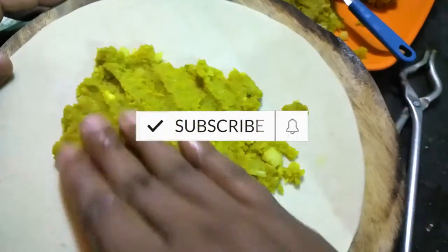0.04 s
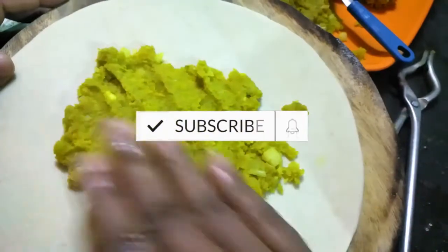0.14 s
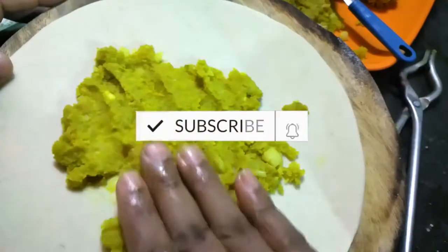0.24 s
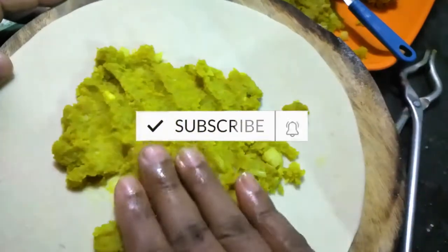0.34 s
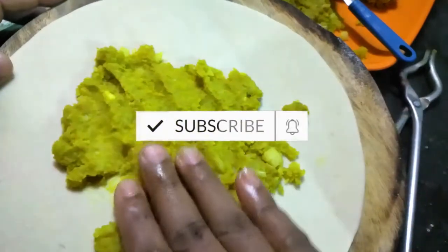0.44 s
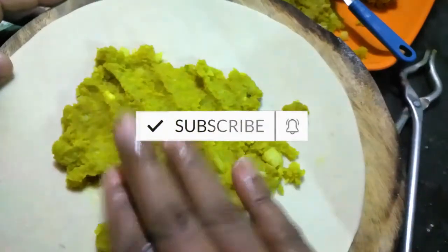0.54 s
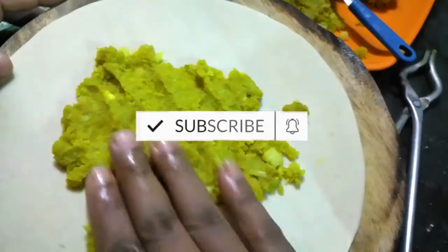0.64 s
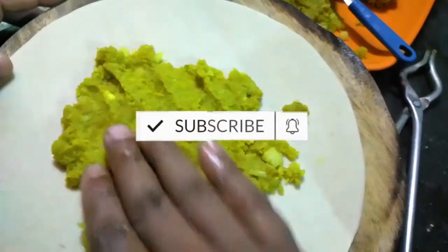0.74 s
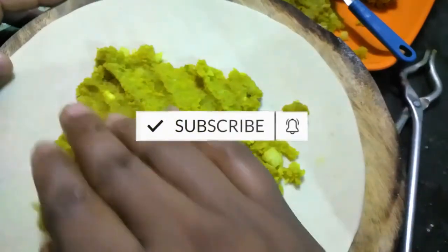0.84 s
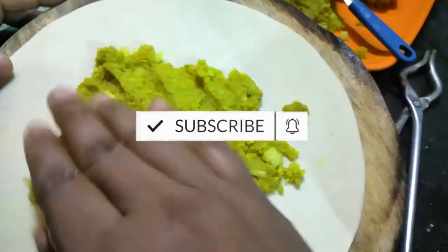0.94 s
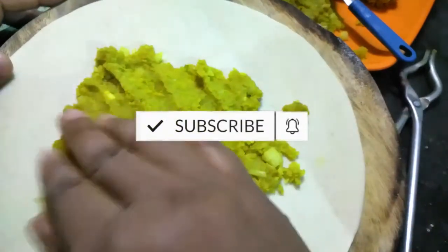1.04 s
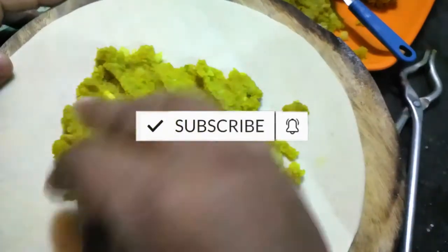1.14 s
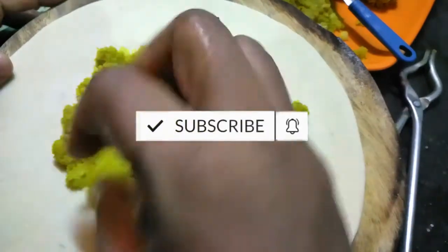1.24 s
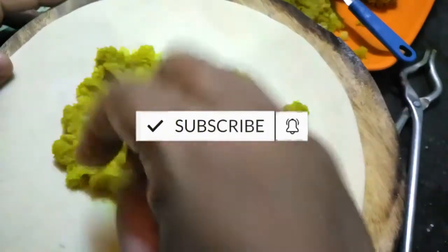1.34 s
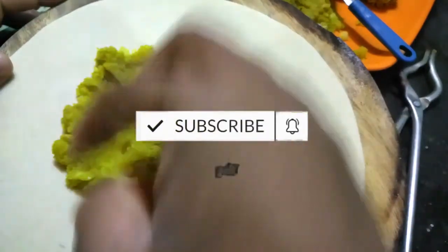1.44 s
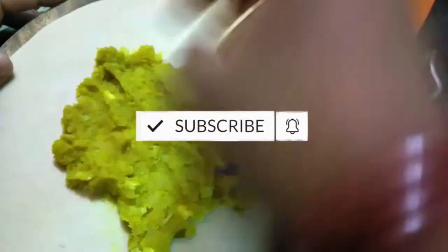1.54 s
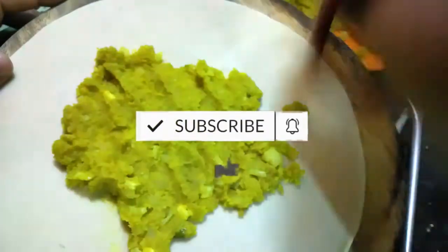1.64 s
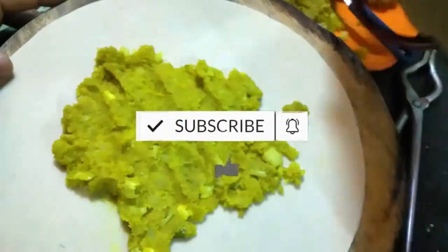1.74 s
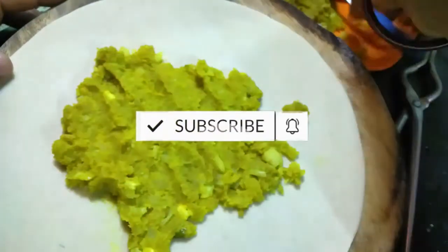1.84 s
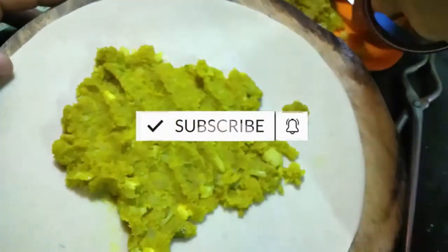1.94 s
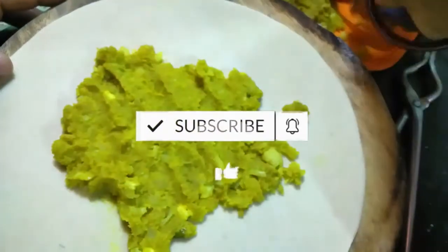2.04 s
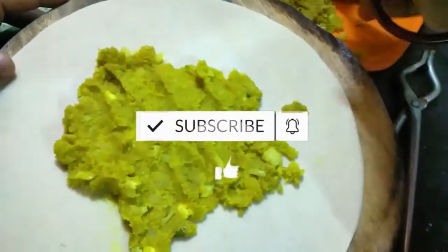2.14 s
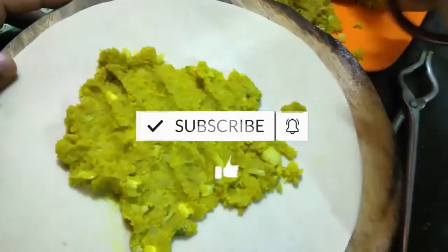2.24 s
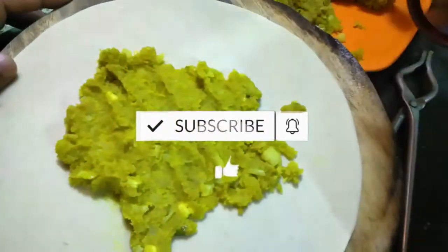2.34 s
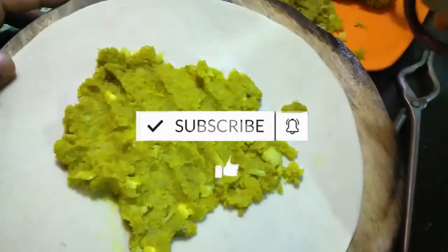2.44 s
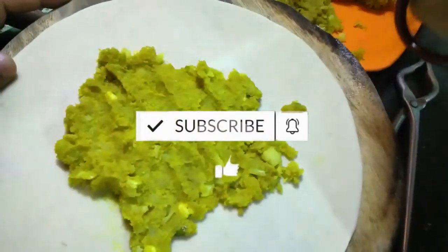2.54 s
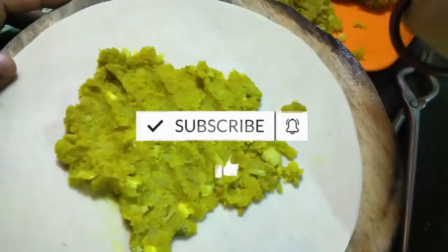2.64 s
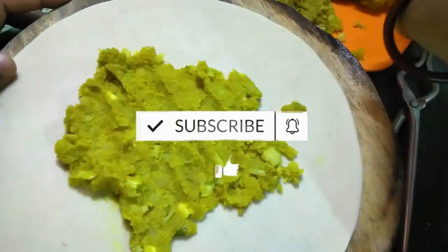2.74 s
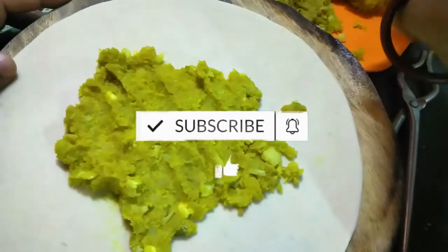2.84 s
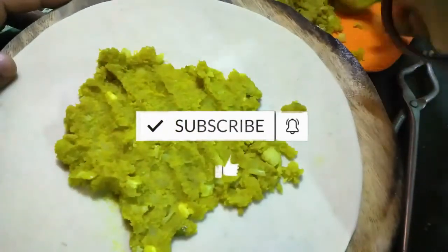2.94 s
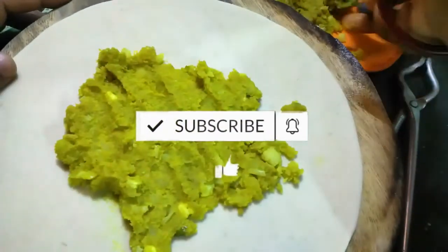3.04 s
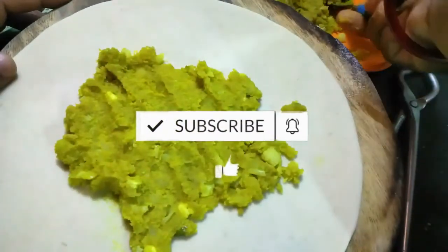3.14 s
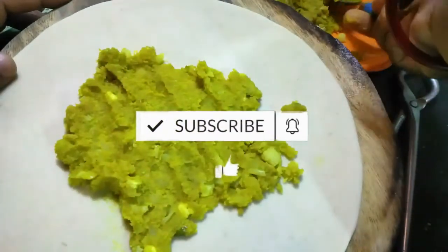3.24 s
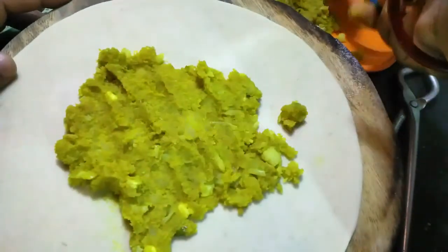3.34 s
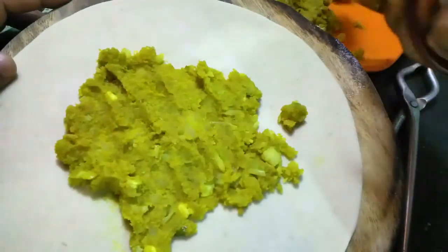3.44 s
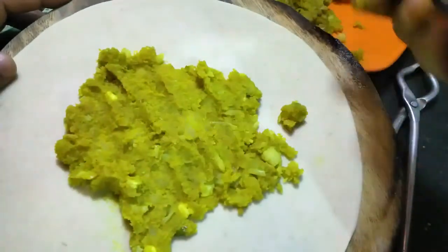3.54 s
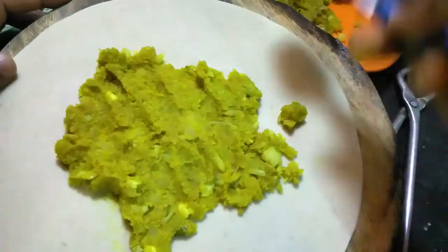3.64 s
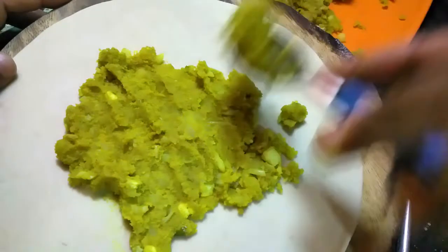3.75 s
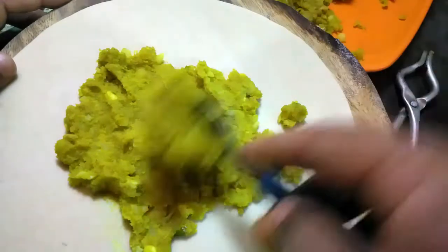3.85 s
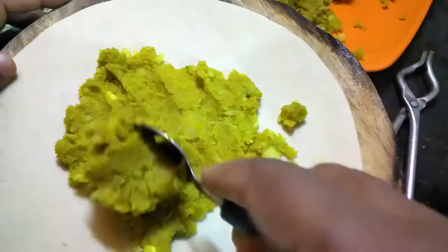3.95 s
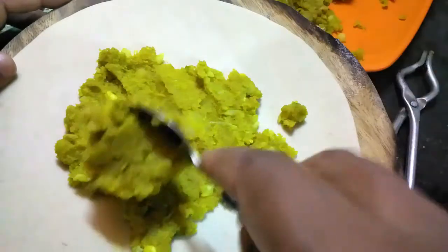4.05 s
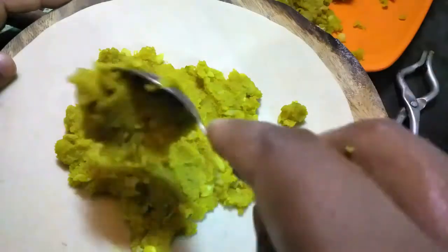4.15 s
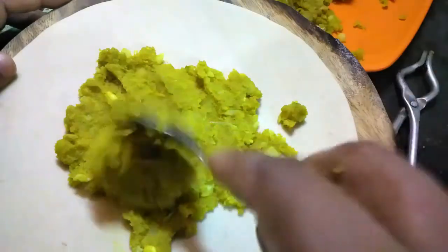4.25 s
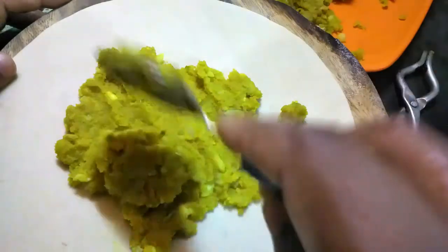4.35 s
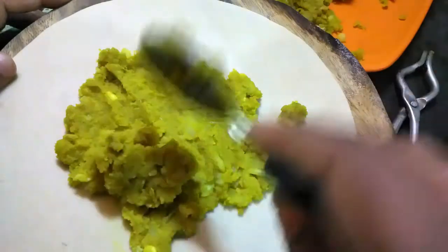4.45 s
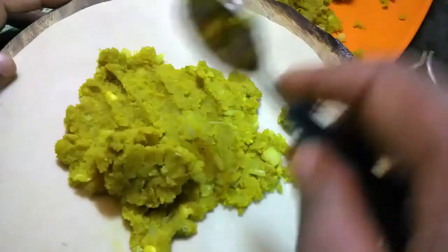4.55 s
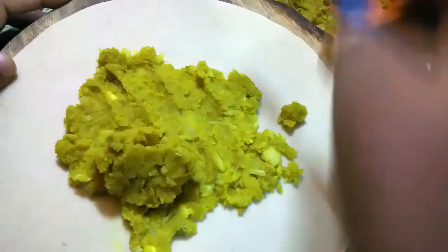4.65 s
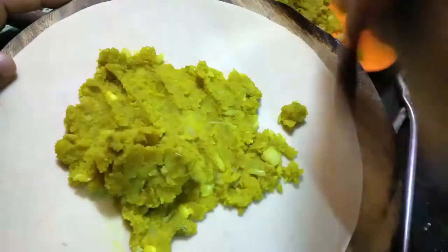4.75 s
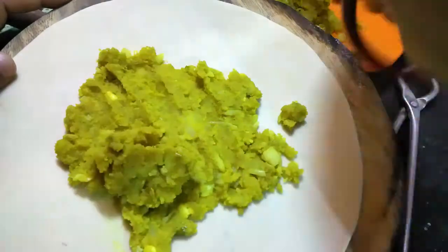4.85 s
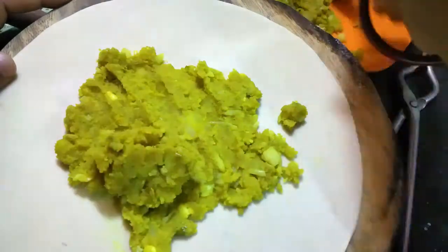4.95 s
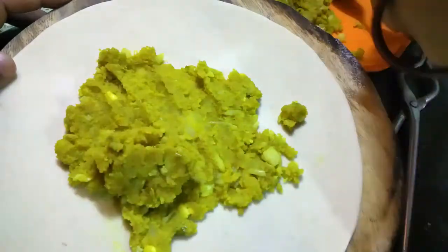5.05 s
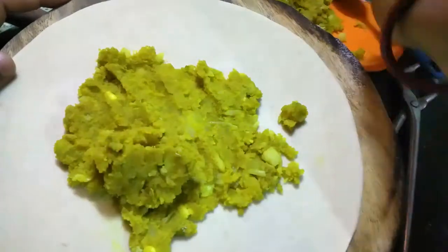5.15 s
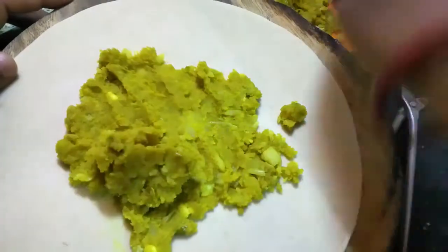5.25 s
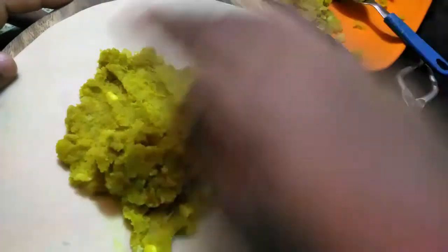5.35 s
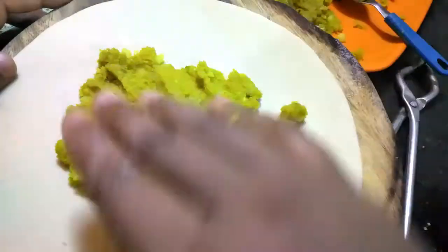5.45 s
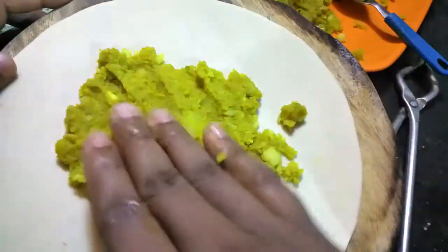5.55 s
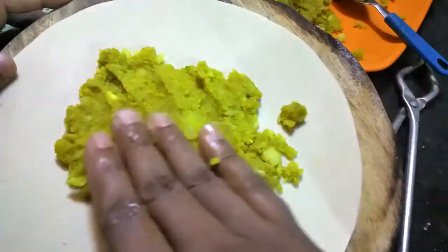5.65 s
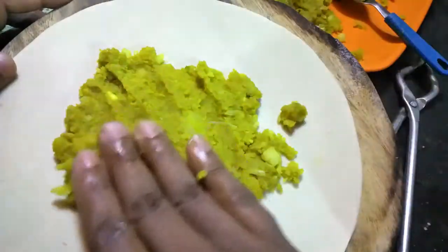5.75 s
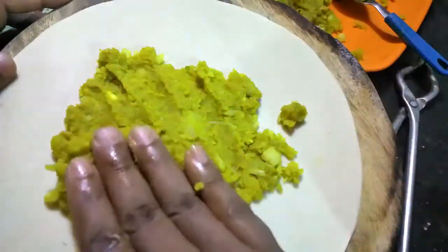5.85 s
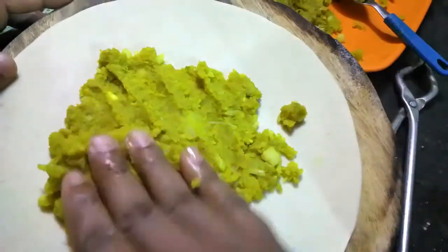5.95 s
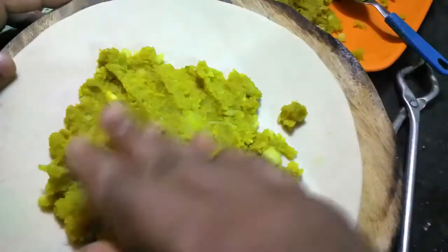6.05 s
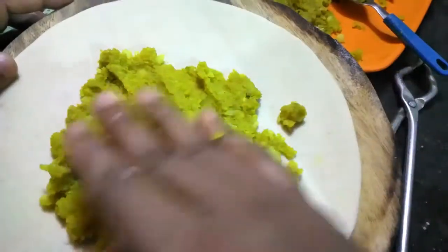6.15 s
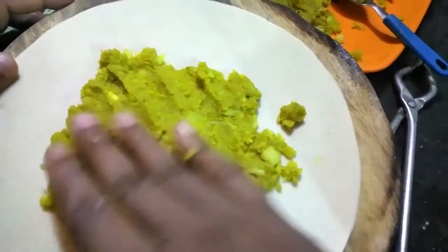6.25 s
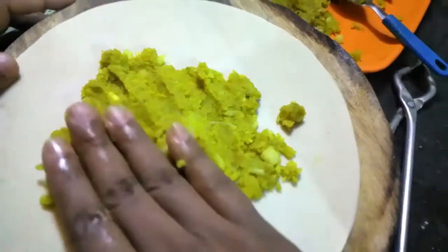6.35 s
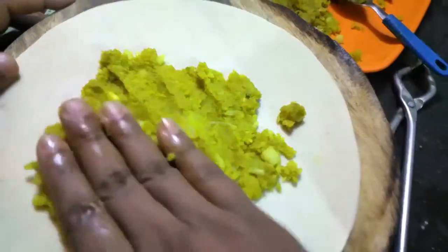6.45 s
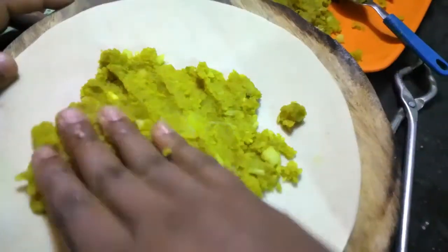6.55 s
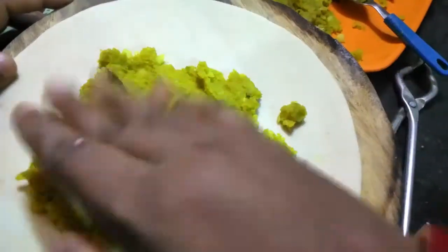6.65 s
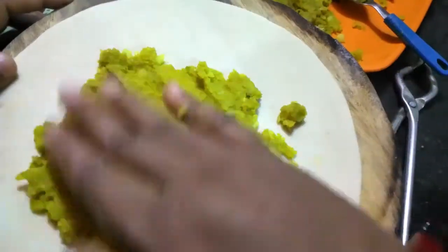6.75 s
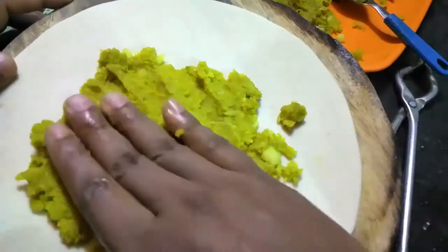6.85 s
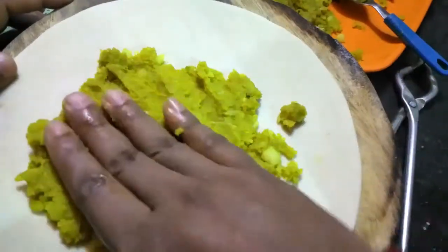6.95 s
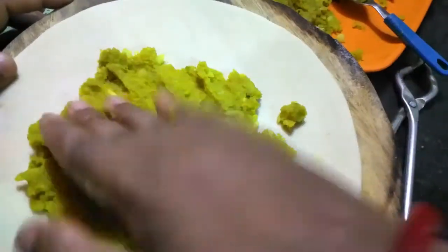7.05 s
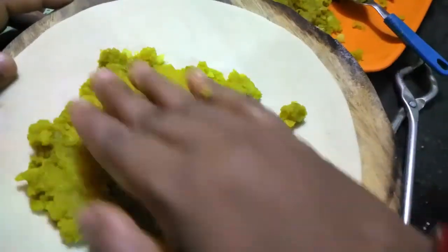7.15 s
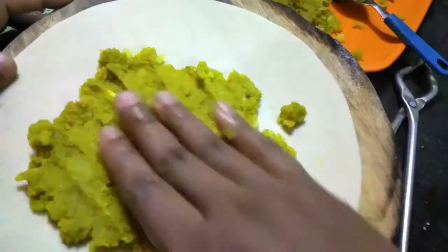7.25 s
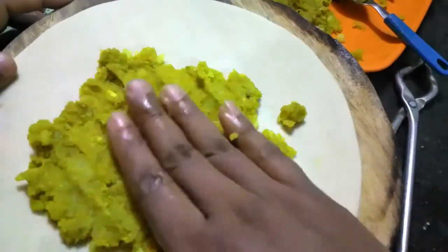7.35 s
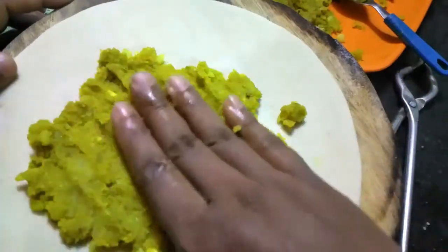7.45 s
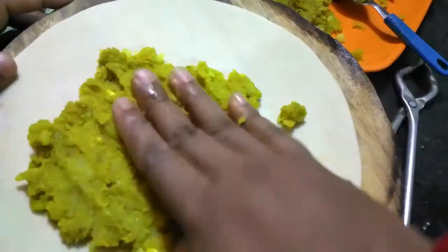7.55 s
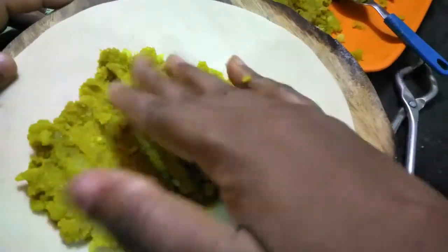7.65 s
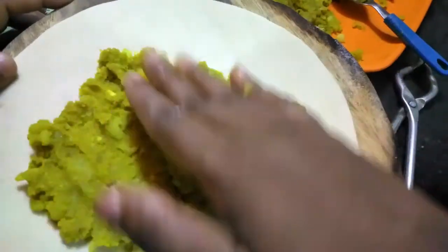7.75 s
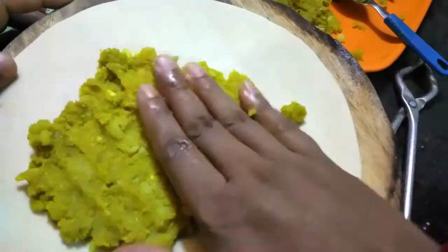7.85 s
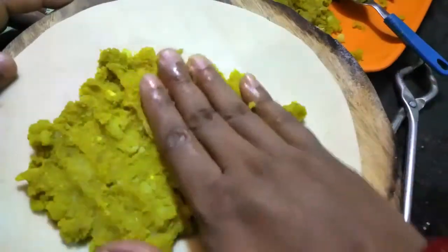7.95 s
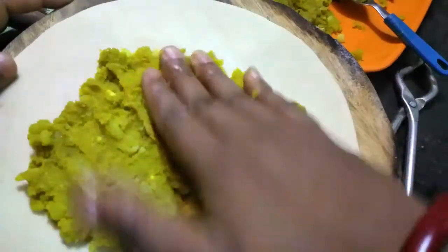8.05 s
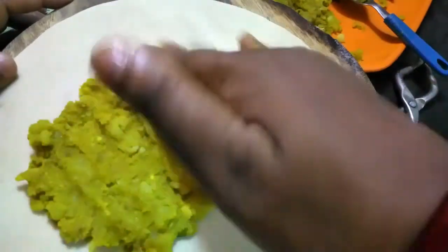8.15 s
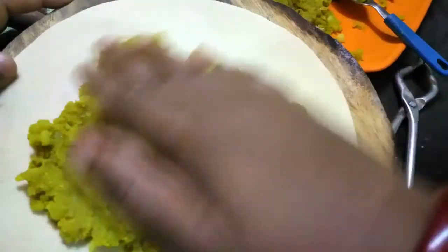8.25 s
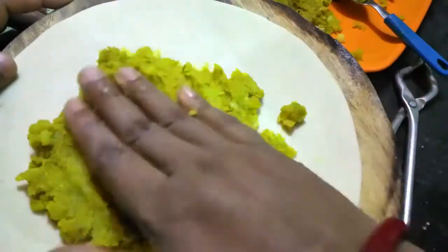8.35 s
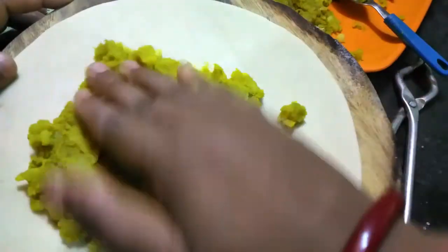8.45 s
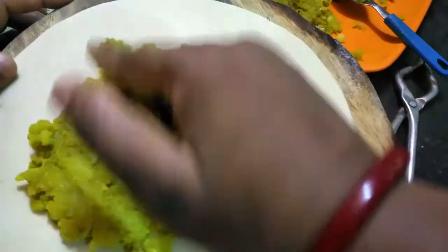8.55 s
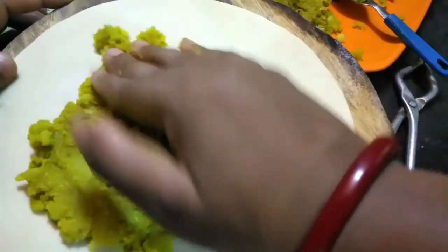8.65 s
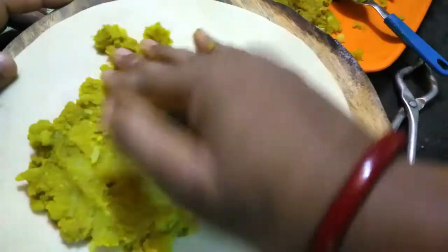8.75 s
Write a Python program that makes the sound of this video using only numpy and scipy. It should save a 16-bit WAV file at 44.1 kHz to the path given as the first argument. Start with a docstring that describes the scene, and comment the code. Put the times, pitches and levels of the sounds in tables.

```python
"""A small kitchen, the microphone close to the board, soft room noise and a low hum throughout.
Fingers press a moist filling over a sheet of dough; it crackles stickily as they peel off.
Near 2 s a metal spoon skids on a plastic plate, and near 3 s it scrapes up more filling.
Just after 5 s the spoon is dropped back on the plate with one sharp clack.
Then the fingers press and peel again, more busily, to the end."""
import sys
import numpy as np
from scipy import signal
from scipy.fft import rfft, irfft
from scipy.io import wavfile
from scipy.ndimage import uniform_filter1d

SR = 44100
rng = np.random.default_rng(int(sys.argv[2]) if len(sys.argv) > 2 else 0)


def int16_out(signal):
    """Quantize to a 16-bit WAV file."""
    q = np.round(np.clip(np.atleast_2d(signal).T, -1, 1) * 32767)
    wavfile.write(sys.argv[1], SR, q.astype(np.int16))


N = 387638
TIME = np.arange(N) / SR


def from_db(db):
    """Decibels to gain."""
    return 10 ** (np.asarray(db) / 20)


def unit_rms(x):
    """Scale to unit rms."""
    return x / np.sqrt(np.mean(x ** 2) + 1e-20)


def at_hz(points, hz):
    """Read a table on a log-frequency axis."""
    table_hz, values = np.transpose(points)
    return np.interp(np.log(hz), np.log(table_hz), values)


def coloured(x, spectrum, size=16384):
    """Pass x through a minimum-phase filter of unit energy with the given spectrum."""
    hz = np.maximum(np.fft.rfftfreq(size, 1 / SR), 1)
    cepstrum = irfft(np.log(from_db(at_hz(spectrum, hz))))
    response = irfft(np.exp(rfft(2 * cepstrum[:size // 2], size)))
    return signal.fftconvolve(x, response / np.linalg.norm(response))[:N]


def drift(per_s):
    """A random wander of unit rms that turns per_s times a second."""
    return unit_rms(np.interp(TIME * per_s, np.arange(N), rng.standard_normal(N)))


def clicks(rows):
    """One impulse for each (seconds, dB) row."""
    out = np.zeros(N)
    for s, db in rows:
        out[round(s * SR)] += from_db(db)
    return out


def swells(rows, roundness, depth_db=20.5):
    """Gain of gestures that rise and fall by depth_db over swell and fade; roundness 2 is a bell."""
    power = np.zeros(N)
    for peak_s, swell_s, fade_s, db in rows:
        away = np.abs(TIME - peak_s) / np.where(TIME < peak_s, swell_s, fade_s)
        near = away < 3
        power[near] += from_db(db - depth_db * away[near] ** roundness) ** 2
    return np.sqrt(power)


def ring(force, modes):
    """Damped sines set ringing by a force."""
    out = np.zeros(N)
    for hz, db, t60 in modes:
        r, w = from_db(-60 / (t60 * SR)), 2 * np.pi * hz / SR
        out += from_db(db) * signal.lfilter([0, np.sin(w)], [1, -2 * r * np.cos(w), r * r], force + 1e-18)
    return out


def scatter(x, t60):
    """Spread each impulse into a dense dying burst of the same energy."""
    t = TIME[:SR // 2]
    burst = rng.standard_normal(len(t)) * from_db(-60 * t / t60)
    return signal.fftconvolve(x, burst / np.linalg.norm(burst))[:N]


def grains(per_s, clump_db, spread_db=0):
    """Tiny random ruptures that come in clumps, their power held near 1."""
    sizes = from_db(spread_db * np.minimum(rng.exponential(1, N), 4))
    signs = rng.choice([-1, 1], N)
    train = sizes * signs * (rng.random(N) < per_s / SR)
    local_power = np.abs(uniform_filter1d(train ** 2, size=1200))
    clumps = unit_rms(from_db(clump_db * np.clip(drift(150), -2, 2)))
    return clumps * train / np.sqrt(local_power + 0.00085)


# The kitchen's air and its low rumble. Each row: frequency in Hz, relative level in dB.
AIR_COLOUR = [(80, -31), (140, -3), (270, -2.5), (340, -3), (410, 0.5), (600, -3.5), (850, -2.5),
              (1450, -10.5), (2100, -11), (2900, -19), (4700, -22.5), (5800, -21.5), (6900, -20.5),
              (8500, -27), (13500, -28), (15500, -27.5)]
RUMBLE_COLOUR = [(12, -6.5), (28, 2), (40, -7.5), (56, -8.5), (75, -14.5), (100, -8.5), (125, -11.5),
                 (155, -33), (250, -49)]
# The rumble grows toward the end. Each row: time in seconds, level in dB.
RUMBLE_LEVEL = [(0.0, -58.5), (0.56, -57), (6.59, -58.5), (8.79, -52.5)]

def room_tone(air_db=-58, hum_hz=101.7, hum_db=-64.5, whine_hz=2120, whine_db=-68):
    """All round the microphone: steady air, rumble, a wavering hum and one brief thin whine."""
    air = from_db(air_db) * coloured(rng.standard_normal(N), AIR_COLOUR)
    rumble_db = np.interp(TIME, *np.transpose(RUMBLE_LEVEL))
    rumble = from_db(rumble_db) * coloured(rng.standard_normal(N), RUMBLE_COLOUR)
    hum = from_db(hum_db) * np.sin(2 * np.pi * hum_hz * TIME + 0.12 * drift(2.7))
    hum *= 1 + 0.12 * drift(3.4)
    whine = np.sin(2 * np.pi * whine_hz * TIME + 0.6 * drift(23))
    whine *= swells([(6.64, 0.084, 0.95, whine_db)], roundness=0.93)
    return air + rumble + np.sqrt(2) * (hum + whine)


# The small kitchen's reverberation. Each row: frequency in Hz, seconds to fall 60 dB.
KITCHEN_T60 = [(200, 0.24), (800, 0.39), (2300, 0.37), (6500, .34), (9000, 0.29), (15000, 0.36)]

def kitchen_echoes(x, first_echo_s=0.0049):
    """Diffuse echoes off the near walls die at their own pace in each band."""
    t, response = TIME[:SR], np.zeros(SR)
    edges_hz = np.geomspace(100, 18000, 12)
    white = rng.standard_normal((2, SR))
    for k, band in enumerate(zip(edges_hz, edges_hz[1:])):
        echoes = signal.sosfilt(signal.butter(2, band, "band", fs=SR, output="sos"), white[k % 2])
        t60 = at_hz(KITCHEN_T60, np.sqrt(np.prod(band)))
        response += echoes * from_db(-60 * t / t60)
    response *= np.clip(t / first_echo_s - 1, 0, 1)
    return signal.fftconvolve(x, response / np.linalg.norm(response))[:N]


# Slides over the filling. Each row: firmest moment, swell and fade in seconds, level in dB.
SLIDES = [(.05, .2, 0.32, -65.5), (4.1, 0.29, 0.45, -67.5), (6.1, .9, .9, -81), (7.35, 0.72, 3.2, -66.5),
          (8.45, 1.4, 1.4, -67)]
# Their soft smear. Each row: frequency in Hz, relative level in dB.
SMEAR_COLOUR = [(300, -10.5), (900, 2), (2000, 1.5), (3300, -0.5), (5000, -16), (7000, -7.5), (9000, -20.5),
                (16000, -19)]
# Bumps of the hand. Each row: start in seconds, relative level in dB.
PATS = [(.23, -44.5), (.595, -39), (2.48, -45.5), (4.225, -52), (5.035, -46), (7.497, -45), (7.748, -51),
        (8.7, -51)]
# The board under the microphone. Each row: mode in Hz, gain in dB, seconds to fall 60 dB.
BOARD_MODES = [(84, 0.5, .14), (125, -5.5, 0.063), (208, -10.5, 0.06)]

def hand():
    """The palm rubs softly and bumps the board through the dough."""
    smear = coloured(grains(per_s=5000, clump_db=1.5), SMEAR_COLOUR)
    bumps = ring(clicks(PATS), BOARD_MODES)
    return swells(SLIDES, roundness=1.4) * smear + from_db(-3) * bumps


# A cut into the heap on the plate. Each row: hardest moment, swell and fade in seconds, level in dB.
SCOOP = [(2.9, 0.077, .11, -51.5)]
# Its rasp. Each row: frequency in Hz, relative level in dB.
SCOOP_COLOUR = [(300, -17), (600, -2), (980, 4.5), (1350, -11), (2300, -0.5), (3700, -15), (4800, -10),
                (5400, -1), (6200, -12), (7000, -8), (9500, -18), (13500, -15), (15200, -12)]

def spoon_scoop():
    """The spoon rasps softly through the crumbly filling."""
    rasp = coloured(grains(per_s=2700, clump_db=1.7), SCOOP_COLOUR)
    return swells(SCOOP, roundness=1.8) * rasp


# The spoon skids to rest. Each row: loudest moment, swell and fade in seconds, level in dB.
SKID = [(1.887, 0.011, 0.054, -42)]

def spoon_skid(fast_hz=3200, slow_hz=1837, brake_s=0.00367, roughness=0.078):
    """A rough squeak of regular slips whose rate drops as the spoon slows."""
    speed = 0.5 - 0.5 * np.tanh((TIME - SKID[0][0]) / (2 * brake_s))
    slip_hz = (slow_hz + (fast_hz - slow_hz) * speed) * (1 + roughness * drift(900))
    phase = 2 * np.pi * np.cumsum(slip_hz) / SR
    squeak = np.sin(phase) + speed * from_db(-7) * np.sin(2 * phase)
    return swells(SKID, roundness=2.3) * np.sqrt(2) * squeak


# Blows on the plate, the drop last. Each row: start in seconds, relative level in dB, cut-off in Hz.
KNOCKS = [(2.841, -22.5, 1290), (2.982, -32, 15000), (3.02, -22.5, 7000), (3.173, -38.5, 4000),
          (5.1206, 2.5, 14000)]
# Each blow is followed by a quick rebound, then a short echo.
# Each row: delay in seconds, level against the blow in dB.
REBOUND_AND_ECHO = [(.0045, -10.5), (0.0178, -15)]
# Spoon and plate ringing together. Each row: mode in Hz, gain in dB, seconds to fall 60 dB.
PLATE_MODES = [(265, -18.5, 0.084), (641, -30.5, 0.17), (876, -28, 0.07), (1135, -30, 0.22),
               (1770, -28.5, 0.018), (1875, -34.5, 0.1), (2000, -33.5, 0.17), (2314, -4.5, 0.019),
               (2250, -36, 0.1), (2440, -33, 0.13), (3277, -9.5, 0.021), (3542, -37, .15),
               (4334, -37.5, .14), (6170, -15, .012), (6368, -35, .14), (6910, -5.5, 0.016),
               (6939, -34.5, .2)]
# The plate's dense crack, with the microphone's bright resonance near 15 kHz.
# Each row: frequency in Hz, relative level in dB.
CRACK_AND_MIC_COLOUR = [(50, -31), (150, -18.5), (230, -12), (520, -15.5), (670, -1), (1000, -5),
                        (1400, -5.5), (1900, -4), (2850, -9), (3350, -2.5), (4700, -6.5), (6900, -5),
                        (8100, -19), (10000, -26), (13500, -29), (15200, -18.5)]

def spoon_knocks(radiate_hz=600):
    """Each blow rings the plate's main modes and sets off a short dense crack and a longer rattle."""
    arrivals = [(0.00034, 0.027)] + REBOUND_AND_ECHO   # the first contact leads
    force = np.zeros(N)
    for s, db, cutoff_hz in KNOCKS:
        blow = clicks([(s + delay, db + arrival_db) for delay, arrival_db in arrivals])
        # a soft contact loses its treble
        force += signal.sosfilt(signal.butter(1, cutoff_hz, fs=SR, output="sos"), blow + 1e-18)
    # a small plate radiates little bass
    bass_cut = signal.butter(2, radiate_hz, "high", fs=SR, output="sos")
    modes = from_db(-6) * signal.sosfilt(bass_cut, ring(force, PLATE_MODES))
    crack = from_db(6) * scatter(force, t60=0.035)
    rattle = from_db(3) * scatter(force, t60=0.12)
    return modes + coloured(crack + rattle, CRACK_AND_MIC_COLOUR)


# Drags over the plate. Each row: hardest moment, swell and fade in seconds, relative level in dB,
# bite of the edge from 0 to 1.
SCRAPES = [(1.883, .008, 0.019, -41.5, 0.13), (1.917, 0.032, 0.022, -44.5, 0.02),
           (3.003, 0.06, 0.059, -34, 0.99)]
# The spoon's bowl and its edge on plastic. Each row: frequency in Hz, relative level in dB.
BOWL_COLOUR = [(400, -29), (620, -10), (790, 1), (1020, -4), (1150, -2.5), (1500, -15), (1850, 4),
               (2100, 1.5), (2850, -4), (3600, -10), (4800, -43), (6200, -13), (7100, -12), (9000, -35),
               (16000, -40)]
EDGE_COLOUR = [(400, -35), (750, -19), (1140, -3.5), (1400, -13.5), (1800, -0.5), (2400, -4.5), (2900, -6),
               (3550, -17), (4100, -5), (5500, -10), (6900, -3), (9000, -16.5), (13500, -17.5),
               (15300, -11.5)]

def spoon_scrapes():
    """Stick and slip, dull under the spoon's bowl and bright where its edge bites, rings the plate."""
    chatter = grains(per_s=3000, clump_db=1.5)
    under_bowl, under_edge, force = np.zeros((3, N))
    for *push, bite in SCRAPES:
        slips = swells([push], roundness=2.83) * chatter
        under_bowl += np.sqrt(1 - bite) * slips
        under_edge += np.sqrt(bite) * slips
        force += slips
    rub = coloured(under_bowl, BOWL_COLOUR) + coloured(under_edge, EDGE_COLOUR)
    return from_db(-1) * rub + from_db(-38) * ring(force, PLATE_MODES)


# Fingers or spoon peel off the filling, right under the microphone.
# Each row: moment of strongest pull, swell and fade in seconds, squelch and fizz levels in dB.
PEELS = [(.092, 0.12, 0.044, -56.5, -57.5), (.275, .12, 0.12, -65, -72), (.465, 0.059, 0.066, -59.5, -56),
         (.728, 0.054, 0.054, -60, -60), (1.135, .08, .03, -72, -62.5), (2.795, .015, .04, -68, -66),
         (3.235, .13, 0.07, -68, -65), (4.296, 0.029, .028, -62, -69), (5.83, 0.24, 0.3, -68.5, -67.5),
         (6.034, 0.086, 0.064, -55.5, -53), (6.42, .08, 0.11, -63.5, -66), (6.525, 0.047, 0.14, -57, -58.5),
         (6.615, 0.1, .05, -63, -57), (7.07, .075, 0.089, -57, -54), (7.418, .015, 0.088, -73, -59),
         (7.622, 0.063, 0.057, -51, -48.5), (7.97, 0.093, .07, -67, -66), (8.04, 0.025, 0.15, -51, -53),
         (8.5, 0.13, 0.19, -60, -57.5), (8.645, .03, 0.057, -61, -62)]
# The loudest wet snaps as it lets go. Each row: start in seconds, squelch and fizz levels in dB.
SNAPS = [(0.0104, -32, -39), (0.0277, -28.5, -35), (0.049, -34, -42), (.2708, -34, -36), (0.4605, -31, -22),
         (0.494, -32, -47), (0.51, -35.5, -34), (.7178, -33, -30), (4.0789, -38, -29), (5.874, -34, -47),
         (6.0057, -35, -32), (6.03, -31, -18.5), (6.394, -35, -44), (6.5145, -38, -44), (6.6252, -31, -31),
         (7.0257, -40, -27), (7.4165, -49, -35), (7.5667, -45, -28), (7.6056, -33, -18),
         (8.0305, -24.5, -27), (8.05, -26, -25), (8.1694, -34, -32), (8.464, -32, -26), (8.5963, -33, -29)]
# Wet pockets parting, thin threads breaking. Each row: frequency in Hz, relative level in dB.
SQUELCH_COLOUR = [(500, -25), (1500, -18), (3000, -8.5), (4400, -11), (5700, -4.5), (6300, 1), (6900, 1),
                  (7600, -3.5), (8400, -7.5), (10000, -13), (16000, -53)]
FIZZ_COLOUR = [(4000, -43), (7500, -6), (9500, -15), (11700, -5.5), (12500, -5), (13500, -2.5),
               (15400, 1.5), (16500, -8.5)]

def sticky_filling(snaps_per_s=36, snap_over_peel_db=24.5, snap_max_db=-47):
    """Moist threads break by the thousand among a few larger snaps: pockets squelch, threads fizz."""
    ruptures = grains(per_s=2000, clump_db=3, spread_db=3.5)
    out = np.zeros(N)
    for k, colour in enumerate((SQUELCH_COLOUR, FIZZ_COLOUR)):
        peel = swells([(s, swell_s, fade_s, db[k]) for s, swell_s, fade_s, *db in PEELS], roundness=1.6)
        sizes = np.minimum(from_db(snap_over_peel_db) * peel, from_db(snap_max_db))
        small_snaps = sizes * (rng.random(N) < snaps_per_s / SR)
        loud_snaps = clicks([(s, db[k]) for s, *db in SNAPS])
        snaps = scatter(loud_snaps + small_snaps, t60=0.013)
        out += coloured(peel * ruptures + snaps, colour)
    return out


def scene(echo_db=-14):
    """One microphone close to board and plate, the kitchen faint behind them."""
    plate = spoon_knocks() + spoon_skid() + spoon_scoop() + spoon_scrapes()
    board = sticky_filling() + hand()
    echoes = from_db(echo_db) * kitchen_echoes(plate + board)
    return (plate + board + echoes + room_tone())[None]


def record(dry, ceiling=0.87, cutoff_hz=16000):
    """The loudest peak is rounded off and the highest treble is cut steeply."""
    rounded = ceiling * np.tanh(dry / ceiling)
    return signal.sosfilt(signal.ellip(12, 0.1, 80, cutoff_hz, fs=SR, output="sos"), rounded)


dry = scene()
out = record(dry)
int16_out(out)
```